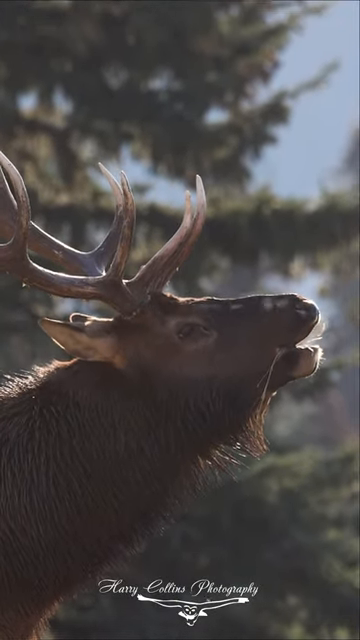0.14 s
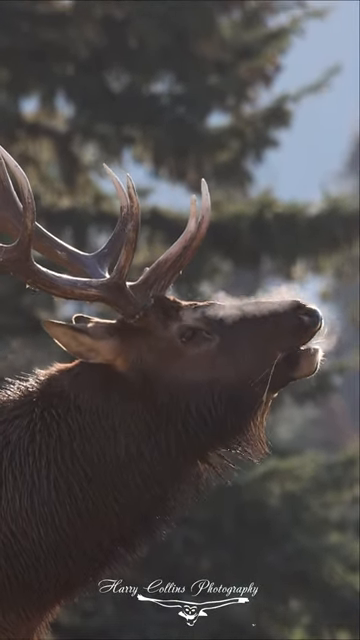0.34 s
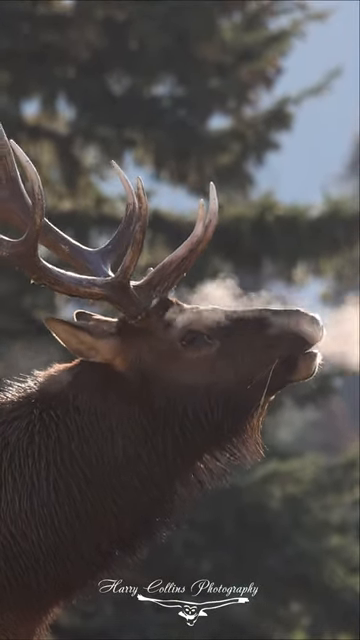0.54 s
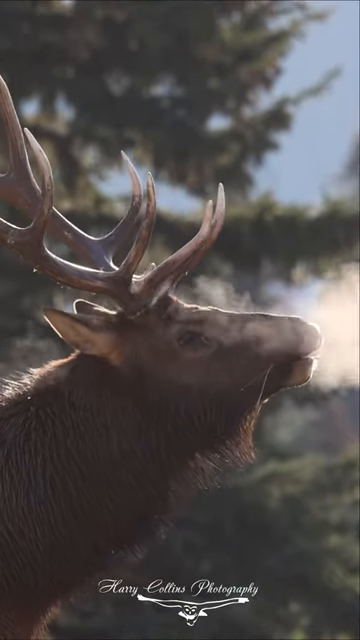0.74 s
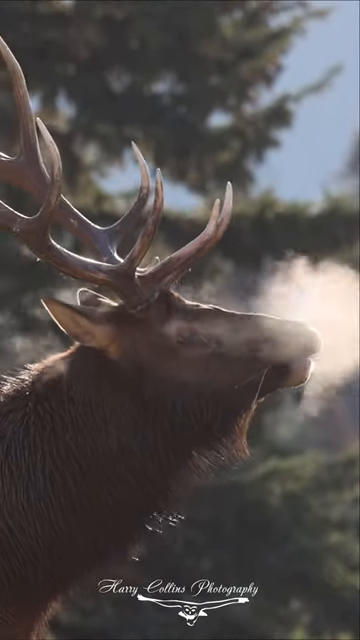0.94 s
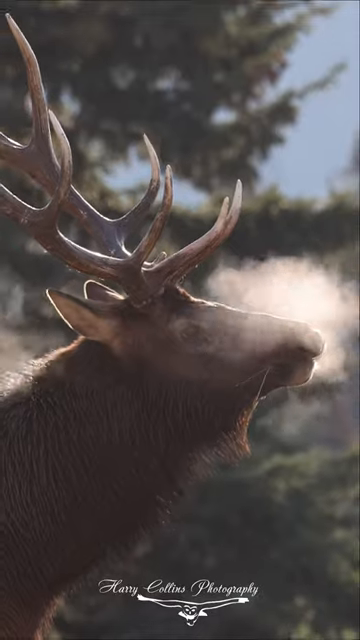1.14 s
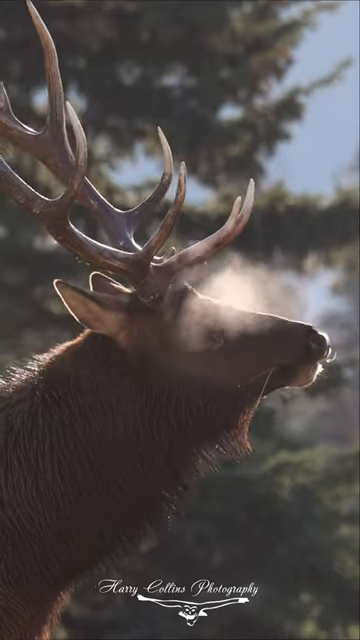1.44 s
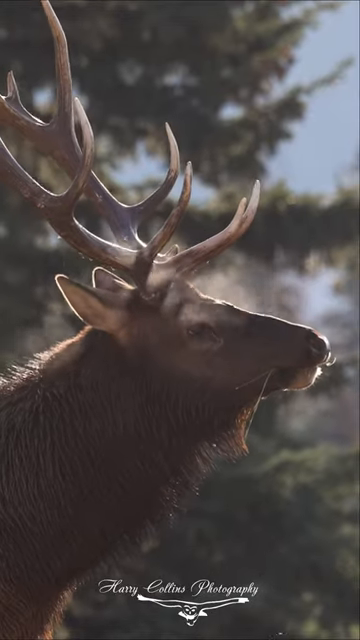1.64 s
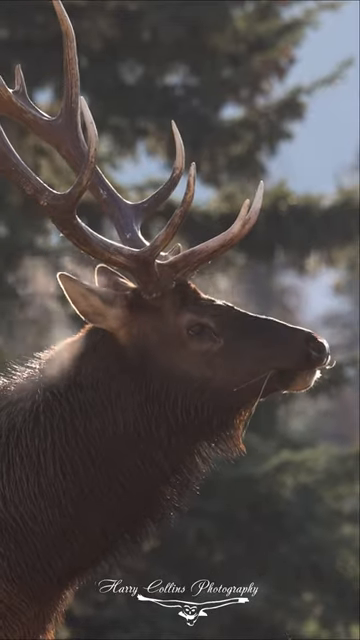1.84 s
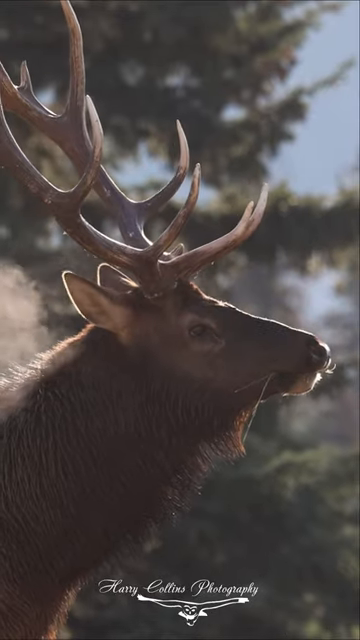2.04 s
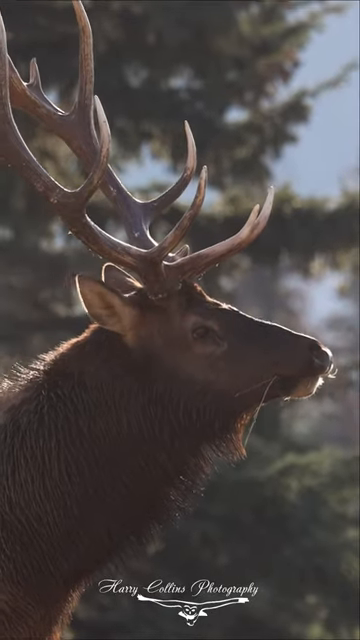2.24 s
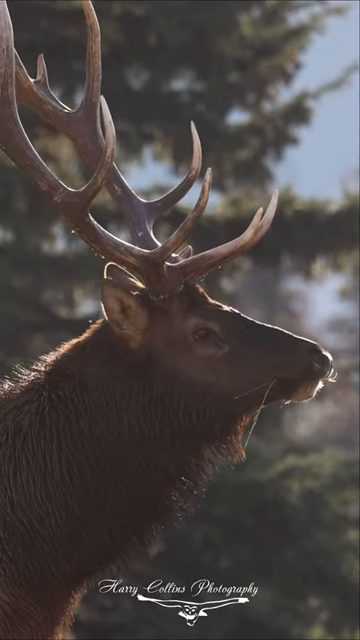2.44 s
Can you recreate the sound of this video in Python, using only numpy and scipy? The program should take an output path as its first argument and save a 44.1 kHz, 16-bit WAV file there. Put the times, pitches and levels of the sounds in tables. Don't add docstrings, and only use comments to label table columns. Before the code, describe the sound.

The last third of a second of a bull elk's bugle: high whistle drops fast into a rough, breathy, low-throbbing groan, then echoes off wooded slopes and fades into faint wind, soft thumps and tiny ticks.

```python
import sys
import numpy as np
from scipy import signal
from scipy.io import wavfile

SR = 44100
rng = np.random.default_rng(int(sys.argv[2]) if len(sys.argv) > 2 else 0)


def inscribe(sig):
    pcm = np.round(np.clip(np.atleast_2d(sig).T, -1, 1) * 32767)
    wavfile.write(sys.argv[1], SR, pcm.astype(np.int16))


def rack_gain(trim_db):
    fader = np.asarray(trim_db, float)
    return 10 ** (fader / 20)


N = 114660
LEAD = 30000
T = np.arange(-LEAD, N) / SR


def in_time(rows):
    s, *columns = np.transpose(rows)
    return [np.interp(T, s, c) for c in columns]


def rms_one(x):
    return x / np.sqrt(np.mean(x ** 2) + 1e-20)


def drift(rate_hz):
    r = np.exp(-2 * np.pi * rate_hz / SR)
    white = rng.standard_normal(len(T) + SR)
    return rms_one(signal.lfilter([1], [1, -2 * r, r * r], white)[SR:])


def resonance(x, hz, width_hz):
    r = np.exp(-np.pi * width_hz / SR)
    poles = [1, -2 * r * np.cos(2 * np.pi * hz / SR), r * r]
    return signal.lfilter(np.array([1, 0, -1]) * (1 - r * r) / 2, poles, x + 1e-18)


def double_resonance(x, hz, width_hz):
    return resonance(resonance(x, hz, width_hz), hz, width_hz)


def ring(clicks, hz, t60):
    r, w = rack_gain(-60 / (t60 * SR)), 2 * np.pi * hz / SR
    return signal.lfilter([0, np.sin(w)], [1, -2 * r * np.cos(w), r * r], clicks + 1e-18)


def band(x, low_hz, high_hz, order):
    return signal.sosfilt(signal.butter(order, [low_hz, high_hz], "band", fs=SR, output="sos"), x)


def fade(end_s, length_s):
    return np.cos(np.pi / 2 * np.clip((T - end_s) / length_s, 0, 1)) ** 2


# frequency in Hz, density in dB per Hz.
WIND_COLOUR = [(15, -57), (25, -26.5), (92, -1.5), (242, -10), (714, -17), (1020, -16), (3920, -31.5),
               (5430, -41.5), (16000, -43)]
# time in seconds, level in dB.
WIND_LEVEL = [(0.0, -64.5), (0.31, -66.5), (0.66, -67), (0.95, -67), (2.6, -66.5)]


def wind():
    level_db, = in_time(WIND_LEVEL)
    hz, db = np.transpose(WIND_COLOUR)
    edges = 22 * 2 ** np.arange(0, 9.6, .5)
    white = rng.standard_normal((2, len(T)))
    out = np.zeros(len(T))
    for k, (low, high) in enumerate(zip(edges, edges[1:])):
        band_db = np.interp(np.log(low * high) / 2, np.log(hz), db) + drift(4)
        out += rack_gain(band_db) * band(white[k % 2], low, high, order=2)
    return rack_gain(7.5 + level_db) * rms_one(out)


def hum():
    tone = double_resonance(rng.standard_normal(len(T)), hz=88, width_hz=26)
    return rack_gain(-68 + 2.5 * drift(4)) * rms_one(tone)


def hiss():
    step_db = 2.5 * (T > 1.455)
    level_db = -82 - 0.36 * (T + 0.8) + step_db + drift(7.3)
    return rack_gain(level_db) * rms_one(band(rng.standard_normal(len(T)), 12300, 17000, order=10))


def late_swell():
    gust = double_resonance(rng.standard_normal(len(T)), hz=676, width_hz=350)
    return rack_gain(-65.5 + 1.4 * drift(3)) * (1 - fade(1.38, 0.19)) * rms_one(gust)


# start in seconds, length in seconds, level in dB, pitch in Hz.
THUMP_EVENTS = [
    (0.347, 0.065, -50.5, 240),
    (1.106, .11, -47.5, 90.6),
    (1.3, .09, -50, 88),
    (2.381, .05, -58, 82),
]


def thumps():
    out = np.zeros(len(T))
    for start_s, length_s, db, hz in THUMP_EVENTS:
        swell = np.sin(np.pi * np.clip((T - start_s) / length_s, 0, 1)) ** 0.74
        out += rack_gain(db) * swell * np.sin(2 * np.pi * hz * (T - start_s))
    return out


# frequency in Hz, level in dB, decay t60 in seconds.
RATTLE_MODES = [(5100, 0, .035), (4450, -3, .03), (3700, -6, .02), (2900, -6, .02)]


def rattle():
    start_s, step_s, whirr_end_s = .563, .0667, 1.1
    run = np.zeros(len(T))
    places = ((start_s + step_s * np.arange(9)) * SR).astype(int)
    run[LEAD + places] = rack_gain(-71 + rng.normal(0, 1, 9))
    clatter = sum(rack_gain(db) * ring(run, hz, t60) for hz, db, t60 in RATTLE_MODES)
    whirr = rms_one(band(rng.standard_normal(len(T)), 1200, 4440, order=2))
    present = fade(whirr_end_s, 0.053) * (1 - fade(whirr_end_s - .6, 0.2))
    return clatter + rack_gain(-76.5) * present * whirr


# start in seconds, level in dB, pitch in Hz, number of touches.
TICK_EVENTS = [
    (1.468, -60.5, 3890, 1),
    (1.675, -59, 3870, 1),
    (1.87, -63.5, 3830, 1),
    (2.03, -58, 3870, 2),
    (2.25, -59, 3520, 1),
    (2.392, -59, 3830, 2),
]


def lone_ticks():
    gap_s, t60_s = .012, 0.014
    out = np.zeros(len(T))
    for start_s, db, hz, touches in TICK_EVENTS:
        click = np.zeros(len(T))
        places = ((start_s + gap_s * np.arange(round(touches))) * SR).astype(int)
        click[LEAD + places] = rack_gain(db)
        body = ring(click, hz, t60_s) + .5 * ring(click, hz * 0.3, t60_s)
        out += band(body, 2260, 5600, order=2)
    return out


# frequency in Hz, decay t60 in seconds, level in dB.
VALLEY_TAIL = [(100, .9, -33.5), (300, 1.2, -22.5), (800, .7, -14.5), (1600, 1.3, -23), (2300, 1.22, -17),
               (3350, 2.1, -16.5), (6500, 0.81, -20), (10000, 0.83, -28.5)]


def valley_tail(x):
    t = np.arange(2 * SR) / SR
    hz, t60, db = np.transpose(VALLEY_TAIL)
    white = rng.standard_normal((3, len(t)))
    near_t60_s, rise_s = 0.26, 0.054
    near = band(white[2], 800, 2900, order=2) / np.sqrt(near_t60_s * SR / 20)
    reply = rack_gain(-5.5 - 60 * t / near_t60_s) * near
    edges = 70 * 2 ** np.arange(0, 7.6, .5)
    for k, (low, high) in enumerate(zip(edges, edges[1:])):
        centre = np.log(low * high) / 2
        life_s = np.interp(centre, np.log(hz), t60)
        decay = rack_gain(np.interp(centre, np.log(hz), db) - 60 * t / life_s)
        scatter = band(white[k % 2], low, high, order=2) / np.sqrt(life_s * SR / 20)
        reply += decay * np.minimum(t / rise_s, 1) * scatter
    return signal.fftconvolve(x, reply)[:len(x)]


# delay in seconds, level in dB, lowest Hz, highest Hz.
SLOPE_ECHOES = [(.11, -6, 3290, 3360), (.11, -4, 6500, 6730), (.225, -28, 36, 900), (.47, -42.5, 40.7, 972),
                (.22, -22, 2183, 2564), (0.308, -34, 2250, 2478), (0.49, -40.5, 2210, 2504)]


def echoes(x):
    out = np.zeros(len(x))
    for delay_s, db, low_hz, top_hz in SLOPE_ECHOES:
        lag = int(delay_s * SR)
        out[lag:] += rack_gain(db) * band(x, low_hz, top_hz, order=2)[:-lag]
    return out


# time in seconds, pitch in Hz, level in dB.
CHEST_LINE = [(.08, 138, -76.5), (.104, 142, -45), (.134, 148.4, -29.5), (.176, 158, -19.5),
              (.224, 157.3, -19), (.25, 150.7, -22.5), (.28, 139.7, -37.5), (.31, 131, -36),
              (.345, 103, -67.5)]


def chest_tone():
    hz, db = in_time(CHEST_LINE)
    cycle = 2 * np.pi * np.cumsum(hz * (1 + .004 * drift(30))) / SR
    cycle = cycle - cycle[LEAD + SR // 5]
    tone = np.sqrt(2) * rack_gain(db) * np.sin(cycle) * fade(0.54, 0.023) * (T > .08)
    depth = 0.96 * np.clip((db + 53.5) / 22, 0, 1)
    return tone, 1.5 + depth * np.sin(cycle + 0.19)


# time in seconds, pitch in Hz.
WHISTLE_PITCH = [(-.1, 3345), (.01, 3312), (.07, 3275), (.094, 3170), (.134, 2320), (.165, 2200),
                 (.2, 1900), (.265, 1400), (.345, 930)]
# time in seconds, level in dB, roughness from 0 to 1.
WHISTLE_LEVEL = [(.012, -31, .02), (.03, -46, .02), (.066, -52, .03), (.094, -27, .08), (.112, -34, .3),
                 (.155, -24, .3), (.21, -24, .55), (.28, -29, .85), (.34, -32, .7)]
# multiple of the pitch, level in dB, time in seconds at which it dies.
WHISTLE_OVERTONES = [(2, -58, .11), (3, -77, .11)]


def nose_whistle():
    (hz,), (db, rough) = in_time(WHISTLE_PITCH), in_time(WHISTLE_LEVEL)
    held = np.clip(T / -.12, 0, 1)
    wander_hz = 26.4 * drift(3) * held + 280.8 * rough * drift(150)
    turn = 2 * np.pi * np.cumsum(hz + wander_hz) / SR
    shake = rack_gain(1.9 * rough * drift(120))
    dip_db = -14 * np.exp(-((T + .055) / .035) ** 4)
    level = rack_gain(db + held * (-29.5 - db) + dip_db)
    whistle = level * shake * np.sin(turn) * fade(.34, 0.0082)
    overtones = np.zeros(len(T))
    for k, level_db, end_s in WHISTLE_OVERTONES:
        overtones += rack_gain(level_db) * shake * np.sin(k * turn) * fade(end_s - .025, .045)
    return whistle, overtones


# time in seconds, level in dB, brightest frequency in Hz.
BREATH_LINE = [(.066, -69, 720), (.082, -33.5, 720), (.12, -29.5, 740), (.16, -36, 800), (.2, -30, 1700),
               (.27, -30, 1200), (.33, -44, 1000), (.37, -56.5, 1034)]


def breath(chop):
    db, bright_hz = in_time(BREATH_LINE)
    return rack_gain(db) * fade(.35, .03) * chop, bright_hz


# frequency in Hz, width in Hz, level in dB.
THROAT_PEAKS = [(670, 65, 0.5), (950, 33, 1), (1040, 140, -3), (1295, 54, 4.5), (1480, 66, 0.5),
                (1818, 69, 6), (2301, 160, 7.5), (2490, 90, -13), (3249, 380, 3), (3323, 97, 4),
                (3660, 78, -15)]


def throat(whistle, stream, bright_hz):
    noise = stream * rng.standard_normal(len(T)) * 4
    floor = 0.17 * (1 - fade(0.063, .05))
    out = rack_gain(-24) * whistle
    for k, (hz, width_hz, db) in enumerate(THROAT_PEAKS):
        octaves = np.log2(hz / bright_hz)
        share = floor + np.exp(-(octaves / 0.31) ** 2 / 2)
        out = out + (-1) ** k * rack_gain(db) * resonance(whistle + noise * share, hz, width_hz)
    return band(out, 470, 3690, order=12)


# frequency in Hz, width in Hz, level in dB.
HIGH_PEAKS = [(4455, 760, -1.5), (5070, 750, 2), (5510, 492, -4.5), (6520, 150, -4), (7600, 360, -11.5)]


def high_breath(stream):
    white = rng.standard_normal(len(T))
    above = band(white, 4750, 9000, order=8)
    out = np.zeros(len(T))
    for hz, width_hz, db in HIGH_PEAKS:
        if hz < 4600:
            part = double_resonance(white, hz, width_hz) * (1 - fade(0.1324, .03))
        else:
            part = double_resonance(above, hz, width_hz)
        out += rack_gain(db) * part
    present = fade(0.13, .14) * np.clip((T - .075) / 0.035, 0, 1)
    return rack_gain(-29) * stream * present * rms_one(out)


def elk():
    chest, chop = chest_tone()
    whistle, overtones = nose_whistle()
    stream, bright_hz = breath(chop)
    voice = throat(whistle * chop, stream, bright_hz)
    return chest + voice + high_breath(stream) + overtones


def scene():
    background = wind() + hum() + hiss() + late_swell() + thumps() + rattle() + lone_ticks()
    call = elk()
    return (background + valley_tail(call) + echoes(call) + call)[None, LEAD:]


def top_cut(x):
    return signal.sosfilt(signal.butter(12, 16620, fs=SR, output="sos"), x)


def record(dry):
    faded_in = dry * np.clip(T[LEAD:] / .0003, 0, 1)
    low_pass = signal.cheby2(16, 60, 15760 + 60, fs=SR, output="sos")
    mix = signal.sosfilt(low_pass, faded_in)
    return top_cut(mix)


dry = scene()
out = record(dry)
inscribe(out)
```